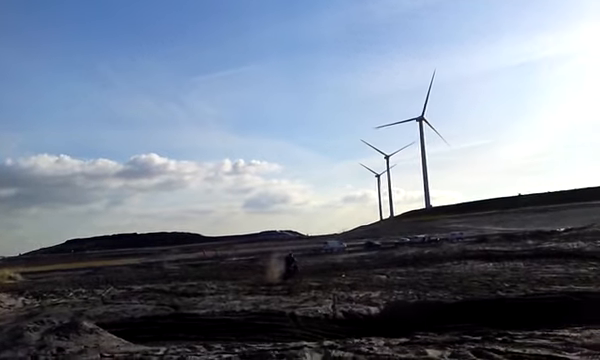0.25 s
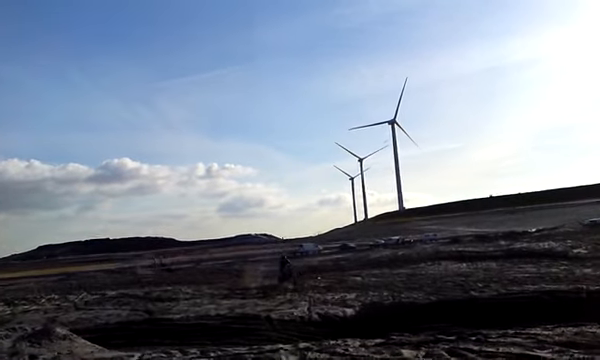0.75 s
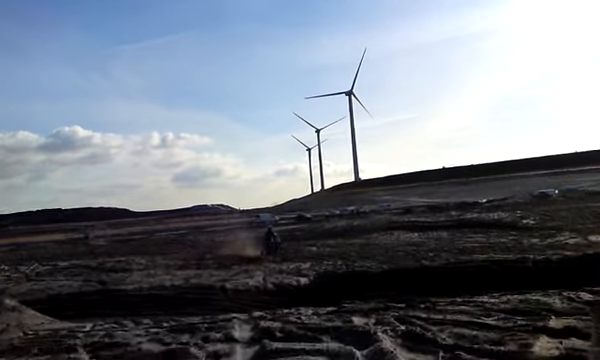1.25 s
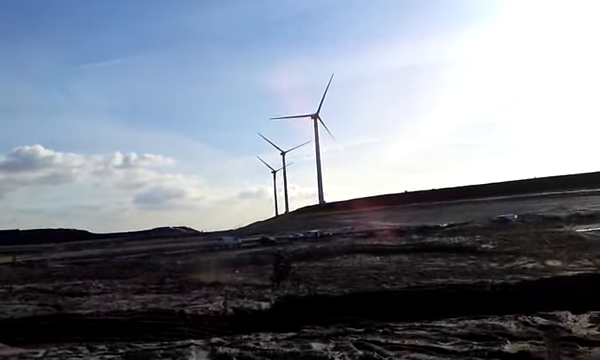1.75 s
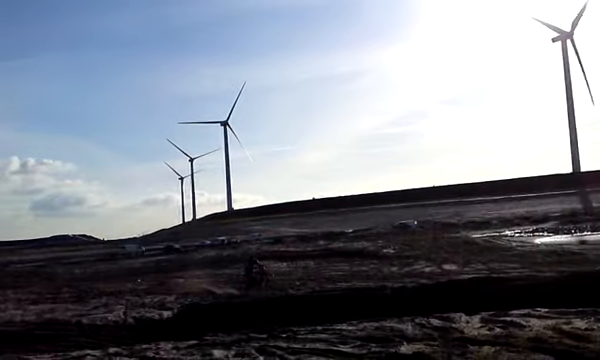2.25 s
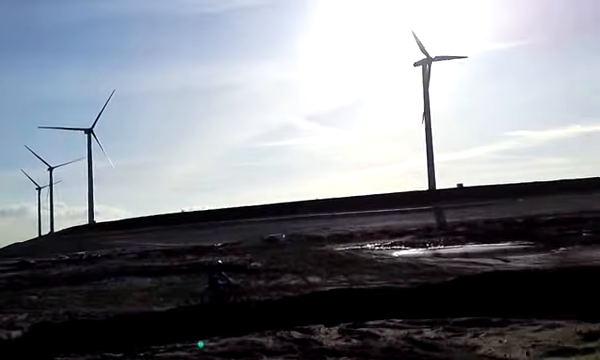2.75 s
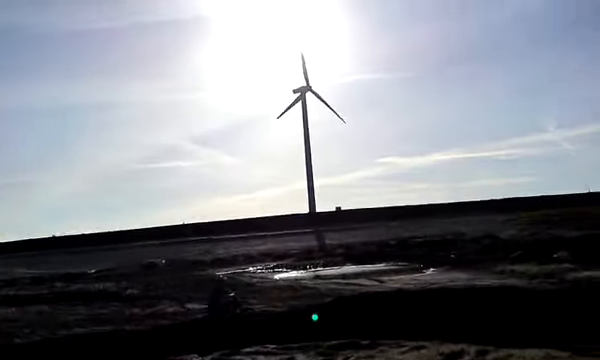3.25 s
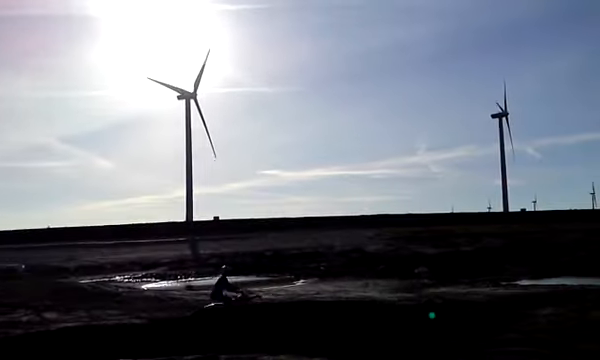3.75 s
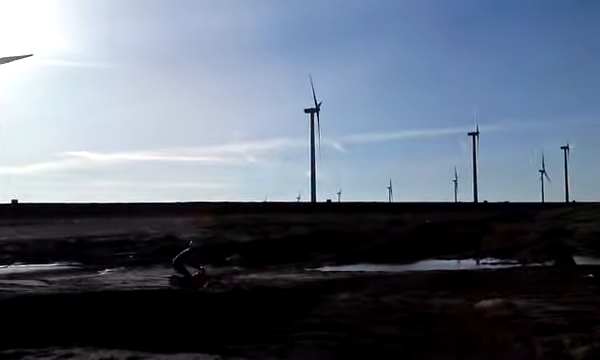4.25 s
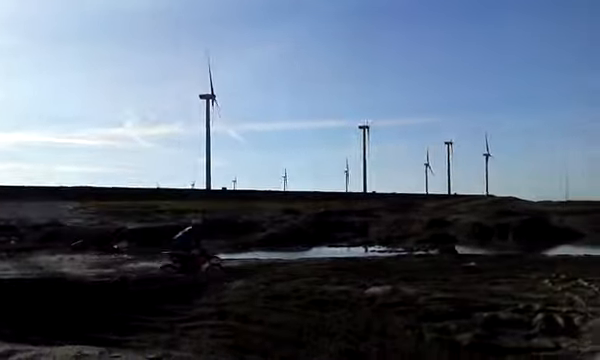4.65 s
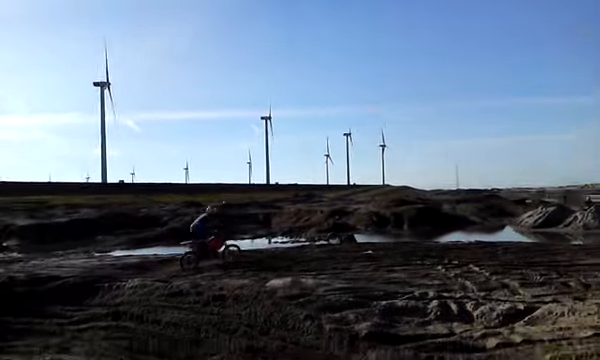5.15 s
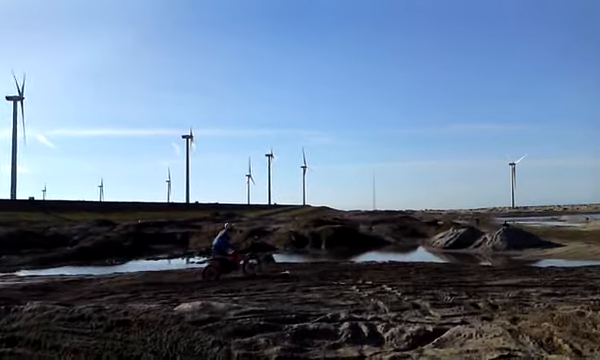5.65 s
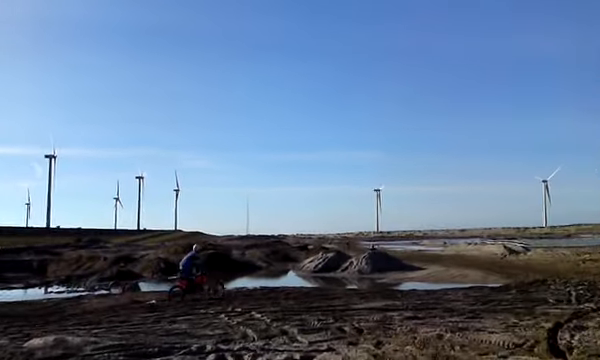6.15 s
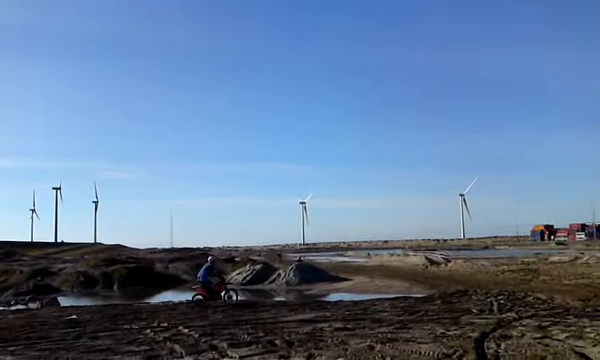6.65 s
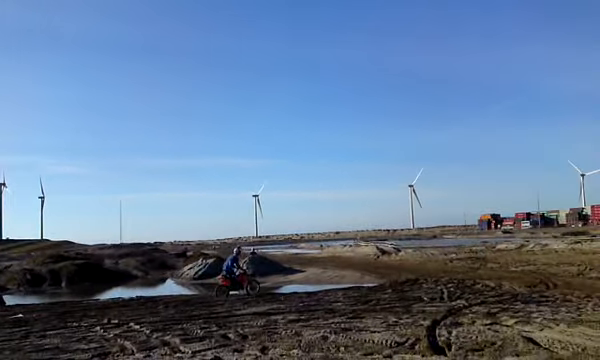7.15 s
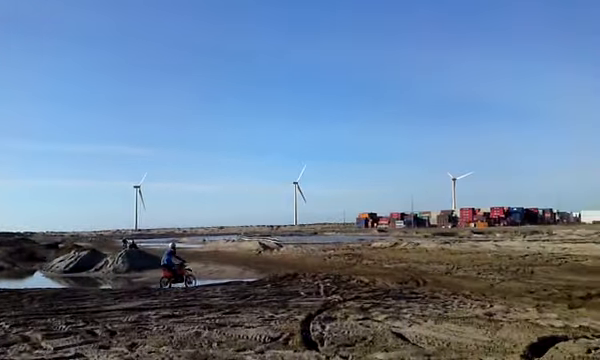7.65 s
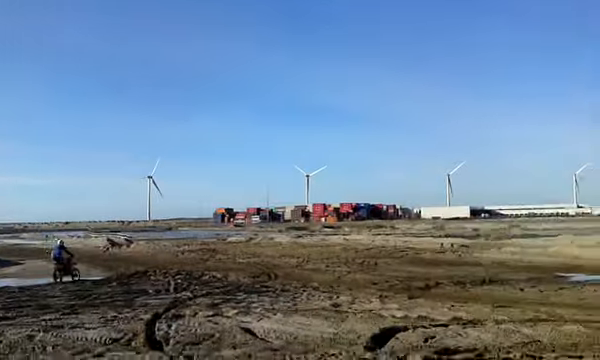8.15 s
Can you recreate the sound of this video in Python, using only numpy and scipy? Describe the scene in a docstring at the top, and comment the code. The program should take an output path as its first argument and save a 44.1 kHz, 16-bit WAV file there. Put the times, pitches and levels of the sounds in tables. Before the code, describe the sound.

Stuttering pops and loud, tinny throttle bursts come from a passing two-stroke dirt bike, with another droning faintly at the end.

```python
"""A two-stroke dirt bike rides past over loose sand. It begins with stuttering pops; from 0.8 s to 2.9 s it
revs in bursts of throttle, the loudest overloading the microphone. Each firing thumps in the exhaust,
barks from the silencer and sets the thin steel expansion chamber ringing. Weaker bursts and more pops
follow, then a last strong burst peaks at 6.5 s. From about 7 s, as the engine coasts, a second bike
drones far off over the open ground."""
import sys
import numpy as np
from scipy import signal
from scipy.fft import rfft, irfft, next_fast_len
from scipy.io import wavfile
from scipy.ndimage import uniform_filter1d

SR = 44100
rng = np.random.default_rng(int(sys.argv[2]) if len(sys.argv) > 2 else 0)


def file_out(sig):
    """Save sig as 16-bit WAV at sys.argv[1]."""
    # one column per channel
    cols = np.atleast_2d(sig).T
    # limit, then scale
    lim = np.clip(cols, -1, 1)
    pcm = np.round(lim * 32767).astype(np.int16)
    wavfile.write(sys.argv[1], SR, pcm)


N = 369558
TIME = np.arange(N) / SR


def from_db(db):
    """Logarithmic level: 20 dB is a factor of ten in amplitude."""
    return 10 ** (np.asarray(db) / 20)


def in_time(rows):
    """Linear interpolation: each column of a time table at every sample."""
    times, *columns = np.transpose(rows)
    return [np.interp(TIME, times, column) for column in columns]


def coloured(x, spectrum):
    """Zero-phase filtering: the spectrum is multiplied by a gain curve (f/Hz, level/dB)."""
    hz, db = np.transpose(spectrum)
    padded = next_fast_len(len(x))
    bins = np.maximum(np.fft.rfftfreq(padded, 1 / SR), 1)
    gain = from_db(np.interp(np.log(bins), np.log(hz), db))
    return irfft(rfft(x, padded) * gain, padded)[:len(x)]


def noise(spectrum, size=N):
    """Spectral shaping: white noise is coloured and scaled to unit rms."""
    x = coloured(rng.standard_normal(size), spectrum)
    return x / np.sqrt(np.mean(x ** 2) + 1e-20)


def drift(rate_hz):
    """Slow random modulation: straight lines between Gaussian values."""
    knots = rng.standard_normal(4000)
    return np.interp(TIME * rate_hz, np.arange(len(knots)), knots)


def click_train(at, energy_db):
    """Impulse excitation: one click per time, its energy in dB re one second at full scale."""
    clicks = np.zeros(N)
    samples = np.clip(np.round(at * SR).astype(int), 0, N - 1)
    np.add.at(clicks, samples, from_db(energy_db) * np.sqrt(SR))
    return clicks


def excite(drive, response):
    """Convolution: a linear system, its impulse response scaled to unit energy, answers the drive."""
    return signal.oaconvolve(drive, response / np.linalg.norm(response))[:N]


def ringing(modes):
    """Modal superposition: a blow leaves damped cosines, the wider in band the shorter lived."""
    t = TIME[:SR // 5]
    return sum((-1) ** k * from_db(db) * np.sqrt(width)
               * np.exp(-np.pi * width * t) * np.cos(2 * np.pi * hz * t)
               for k, (hz, width, db) in enumerate(modes))


def diffuse_bursts(clicks, spectrum, hold_s, tail_s, tail_db, turbulent_share, sides=8):
    """Scattering: each click gives a burst of dense modes and turbulence, with a tail off the ground."""
    t = TIME[:SR // 4]
    envelope = np.exp(-(t / hold_s) ** 4) + from_db(tail_db) * np.exp(-t / tail_s)
    # the passing bike shows one side after another, each with its own mix of modes
    side = np.linspace(0, sides - 1, N)
    modes = np.zeros(N)
    for k in range(sides):
        in_view = np.sqrt(np.maximum(1 - np.abs(side - k), 0))
        modes += excite(clicks * in_view, envelope * noise(spectrum, size=len(t)))
    energy = signal.oaconvolve(clicks ** 2, envelope ** 2 / np.sum(envelope ** 2))[:N]
    turbulence = np.sqrt(turbulent_share * np.abs(energy)) * noise(spectrum)
    return np.sqrt(1 - turbulent_share) * modes + turbulence


def open_air(level_db=-37.5):
    """Stationary noise: the open air is a steady broadband background."""
    # ambient spectrum: f/Hz, relative level/dB
    air_spectrum = [(20, -33.5), (60, -6.5), (130, 0), (500, -10.5), (750, -4), (2500, -7.5), (7000, -3),
                    (9500, -60.5)]
    return from_db(level_db) * noise(air_spectrum)


def far_bike(waver=0.0055, fading_db=4.5, db_per_octave=-3.5, harmonics=6):
    """Atmospheric propagation: only low harmonics carry far, each fading in and out in the moving air."""
    # the distant engine: t/s, firing rate f/Hz, level/dB
    drone = [(6.5, 232, -75), (6.75, 158, -79), (7.07, 188, -52), (7.24, 211, -47), (7.42, 208, -46.5),
             (7.55, 199, -56), (8.05, 185, -53), (8.18, 185, -48.5), (8.38, 190, -47)]
    rate, level = in_time(drone)
    phase = 2 * np.pi * np.cumsum(rate * (1 + waver * drift(30))) / SR
    return sum(from_db(level + db_per_octave * np.log2(k) + fading_db * drift(9)) * np.sin(k * phase)
               for k in range(1, harmonics + 1))


def throttle():
    """Drive, load and inertia: crank speed, ring level and thump level climb, sag and fall back."""
    # crank speed when coasting: t/s, f/Hz
    coast_speed = [(0, 89), (.3, 85), (.5, 75.5), (3.4, 77), (4.6, 72.3), (5.5, 70), (6.06, 65.5),
                   (6.9, 72.3), (7.4, 56.3), (7.75, 61.5), (8, 68.5), (8.38, 58)]
    # running on a nearly shut throttle: t/s, ring level/dB, thump level/dB
    coast_level = [(0, -20.5, -52), (.17, -29.5, -52.5), (.45, -27.5, -38.5), (.75, -27, -43),
                   (2.98, -24, -43), (3.1, -39, -58.5), (3.4, -40.5, -62), (4.5, -33, -57),
                   (4.7, -20.5, -42), (4.79, -42, -66), (5.18, -21.5, -41.5), (5.5, -21, -54),
                   (6.1, -20.5, -59), (6.85, -37, -72), (7.35, -36, -69), (7.55, -24, -64),
                   (7.92, -20.5, -63), (8.38, -23, -58)]
    # bursts of throttle: opening, peak and shutting t/s; firing rate f/Hz at opening and peak;
    # ring level/dB at opening and peak; thump level/dB
    throttle_bursts = [(0.799, 1.1, 1.14, 81, 96, -18.5, -11.5, -40),
                       (1.11, 1.281, 1.72, 107, 163, -8.5, -3, -41),
                       (1.56, 1.82, 1.945, 146, 170, -9, 0, -38),
                       (2.151, 2.47, 2.53, 97, 140, -11, -3.5, -37),
                       (2.625, 2.77, 2.86, 134, 157, -7.5, -8.5, -36.5),
                       (3.438, 3.659, 3.7, 79.3, 90, -28.5, -25, -41),
                       (3.865, 4.125, 4.14, 88, 107, -25.5, -22.5, -34.5),
                       (5.56, 5.73, 5.85, 76, 83, -18.5, -15.5, -33),
                       (6.13, 6.52, 6.545, 72, 105.5, -18.5, -7.5, -36.5)]
    climb_power = 1.5  # revs and level climb ever faster as the engine comes on the pipe
    sag_oct_per_s, sag_db_per_s = .9, 21  # past the peak the sand drags the engine down
    shut_db, shut_s, fade_db_per_s = 9, 0.017, 76.5  # shutting cuts the firings, then they fade
    spin_down_s, flywheel_s = .15, .03  # the crank's speed cannot jump
    thump_rise_db, thump_rise_s = 6.5, 0.11  # the thump fills in after opening
    coast, = in_time(coast_speed)
    ring, thump = in_time(coast_level)
    rate = coast
    for opens, peaks, shuts, rate_from, rate_to, db_from, db_to, thump_db in throttle_bursts:
        climb = np.clip((TIME - opens) / (peaks - opens), 0, 1) ** climb_power
        sagging = np.maximum(np.minimum(TIME, shuts) - peaks, 0)
        shut = np.maximum(TIME - shuts, 0)
        driven = (rate_from + (rate_to - rate_from) * climb) * 2 ** (-sag_oct_per_s * sagging)
        rate = np.where(TIME < opens, rate, coast + (driven - coast) * np.exp(-shut / spin_down_s))
        loss = sag_db_per_s * sagging + shut_db * np.minimum(shut / shut_s, 1) + fade_db_per_s * shut
        loss = np.where(TIME < opens, np.inf, loss)
        unfilled = np.clip(1 - (TIME - opens) / thump_rise_s, 0, 1)
        ring = np.maximum(ring, db_from + (db_to - db_from) * climb - loss)
        thump = np.maximum(thump, thump_db - thump_rise_db * unfilled - loss)
    return uniform_filter1d(rate, int(flywheel_s * SR)), ring, thump


def firings(rate, uneven_db=2.0):
    """Two-stroke cycle: one firing per turn, with its time and its share of a second's energy in dB."""
    # ragged firing under full load: t/s, timing scatter/ms
    raggedness = [(1.12, 0.022), (1.25, 0.3), (1.95, 0.46), (2.13, 0.019), (6.42, .03), (6.5, 0.35),
                  (6.8, 0.056)]
    scatter_ms, = in_time(raggedness)
    turns = np.flatnonzero(np.diff(np.floor(np.cumsum(rate) / SR)))
    late, harder = rng.standard_normal((2000, 2))[:len(turns)].T
    at = TIME[turns] + scatter_ms[turns] * late / 1000
    return at, uneven_db * harder - 10 * np.log10(rate[turns])


def pops(rate, scatter_s=.0005, uneven_db=1.0):
    """Intermittent combustion: times and levels of hard firings, alone or every second or third turn."""
    # single hard firings: t/s, relative level/dB
    # the one at 6.6 s holds up the loud end of the last throttle burst
    lone_pops = [(0.0024, -3.5), (0.0574, -6), (0.1153, -4.5), (0.1785, -6), (0.2301, -8), (0.8827, -5.5),
                 (1.0231, -5.5), (2.15, -3), (3.1635, -17), (3.2274, -18), (3.3004, -20.5), (3.4304, -18.5),
                 (3.8321, -9.5), (3.8713, -15.5), (4.2077, -11.5), (4.2786, -10.5), (4.3188, -11.5),
                 (4.3867, -9), (4.8288, -14.5), (4.8942, -11), (6.2888, -2.5), (6.5994, 0.5), (7.334, -5.5),
                 (7.4137, -7), (7.4704, -12)]
    # runs of stutter: first and last t/s, turns per pop, first and last relative level/dB
    stutters = [(0.279, 0.462, 3, -8, -8), (0.515, .833, 3, -10.5, -6.5), (3.456, 3.494, 3, -19, -17.5),
                (4.567, 4.727, 3, -6.5, -9), (4.961, 5.111, 2, -9, -6.5), (5.157, 5.317, 3, -7, -2.5),
                (5.379, 5.505, 2, -5.5, -6), (5.669, 5.816, 3, -0.5, 0), (5.894, 6.054, 3, -3.5, -8)]
    rows = [np.array(lone_pops)]
    for first, last, turns_per_pop, db_from, db_to in stutters:
        turns = rate[(TIME >= first) & (TIME < last)].sum() / SR
        count = int(round(turns / turns_per_pop)) + 1
        at, db = np.linspace((first, db_from), (last, db_to), count).T
        late, harder = rng.standard_normal((20, 2))[:count].T
        rows.append(np.transpose([at + scatter_s * late, db + uneven_db * harder]))
    return np.vstack(rows).T


def exhaust_thump(clicks):
    """Gas-column resonance: the exhaust thumps through a narrow mouth that radiates little deep bass."""
    # modes of the gas: f/Hz, bandwidth/Hz, relative level/dB
    gas_modes = [(174.5, 35, 1.5), (286, 150, -16), (391, 69, -10.5)]
    # radiation from the mouth: f/Hz, gain/dB
    pipe_mouth = [(80, -5), (115, -4), (165, 0)]
    return coloured(excite(clicks, ringing(gas_modes)), pipe_mouth)


def tailpipe(clicks, decay_s=0.046, turbulent_share=.72):
    """Forced resonance: a sharp front and a dying puff of turbulent gas drive the tailpipe's modes."""
    # modes beamed backwards: f/Hz, bandwidth/Hz, relative level/dB
    tailpipe_modes = [(1785, 310, -4), (2567, 54, -6), (2826, 110, -3.5), (3277, 87, -2.5),
                      (3805, 110, 1.5), (4660, 76, 5.5)]
    fade = np.exp(-2 * TIME[:SR // 5] / decay_s)
    energy = signal.oaconvolve(clicks ** 2, fade / fade.sum())[:N]
    fronts = np.sqrt(1 - turbulent_share) * clicks
    puffs = np.sqrt(turbulent_share * np.abs(energy)) * rng.standard_normal(N)
    return excite(fronts + puffs, ringing(tailpipe_modes))


def silencer(clicks, bark_db=-6.5, jet_db=-0.5):
    """Cavity resonance and jet noise: each pulse barks in the silencer and leaves as a turbulent jet."""
    # modes of the silencer: f/Hz, bandwidth/Hz, relative level/dB
    silencer_modes = [(693, 56, -0.5), (882, 75, 0), (1000, 120, 3), (1360, 110, -13.5), (1880, 13, -0.5)]
    # turbulence in its jet: f/Hz, relative level/dB
    jet_spectrum = [(120, -7), (330, -4), (500, -12.5), (750, 2.5), (1100, -3), (1500, -5), (2200, -25.5),
                    (4000, -12.5)]
    bark = excite(clicks, ringing(silencer_modes))
    jet = diffuse_bursts(clicks, jet_spectrum, hold_s=0.011, tail_s=0.023, tail_db=-12.5,
                         turbulent_share=.38)
    return from_db(bark_db) * bark + from_db(jet_db) * jet


def expansion_chamber(clicks, wall_db=-16.0):
    """Shell vibration: each pulse rings the thin steel, a few modes standing out from a dense mass."""
    # colour of the chamber: f/Hz, relative level/dB
    chamber_spectrum = [(2600, -22.5), (3300, -23), (3600, -7.5), (3850, -6), (4400, 0.5), (5100, 0),
                        (6000, 1), (7100, -1), (7800, -4.5), (8400, -13), (9000, -19), (9500, -78)]
    # its strongest wall modes: f/Hz, bandwidth/Hz, relative level/dB
    wall_modes = [(1890, 29, -9.5), (3837, 15, 2.5), (4270, 68, 0), (4420, 22, -7.5), (5820, 48, 5),
                  (6344, 40, 8)]
    dense_ring = diffuse_bursts(clicks, chamber_spectrum, hold_s=0.024, tail_s=0.033, tail_db=-10.5,
                                turbulent_share=.2)
    return dense_ring + from_db(wall_db) * excite(clicks, ringing(wall_modes))


def turning_treble(rasp):
    """Directivity: the low treble swells and fades as the bike turns."""
    # the band affected: f/Hz, weight/dB
    treble_band = [(3100, -29), (3700, -4.5), (4700, 1), (5600, -29)]
    # its lift or cut at full weight: t/s, level/dB
    treble_level = [(0, 1), (1.4, -2), (2.6, 0.5), (3.6, 2), (6.4, 1), (7.3, 1), (8.38, -7)]
    lift_db, = in_time(treble_level)
    return rasp + (from_db(lift_db) - 1) * coloured(rasp, treble_band)


def near_bike(ring_db=0.5, pop_ring_db=-28.0, pop_bark_db=-27.5, pop_thump_db=-55.5):
    """Source and filter: steady firings and pops drive the same chamber, silencer and pipe."""
    # directivity as the bike turns: t/s, silencer gain/dB, tailpipe gain/dB
    facing = [(0, -29, -43), (.3, -26, -34), (.48, -13.5, -30), (.8, -20, -20.5), (1.3, -23, -21),
              (2.8, -17, -13), (3.35, -11.5, -6), (3.55, -6, -7), (4.1, -7, -10), (4.3, -11.5, -14.5),
              (4.7, -10, -10.5), (5.5, -16.5, -10.5), (6.45, -15, -5), (7.1, -22.5, -7), (7.9, -21.5, -6.5),
              (8.38, -28, -8.5)]
    silencer_gain, tailpipe_gain = from_db(in_time(facing))
    rate, ring_level, thump_level = throttle()
    at, share_db = firings(rate)
    ring = np.interp(at, TIME, ring_level) + share_db
    thump = np.interp(at, TIME, thump_level) + share_db
    pop_at, pop_db = pops(rate)
    on_chamber = click_train(at, ring + ring_db) + click_train(pop_at, pop_db + pop_ring_db)
    on_silencer = click_train(at, ring) + click_train(pop_at, pop_db + pop_bark_db)
    on_pipe = click_train(at, thump) + click_train(pop_at, pop_db + pop_thump_db)
    rasp = expansion_chamber(on_chamber) + tailpipe(tailpipe_gain * on_chamber)
    return turning_treble(rasp) + silencer(silencer_gain * on_silencer) + exhaust_thump(on_pipe)


def scene():
    """Superposition: both bikes and the open air add in one channel."""
    return (near_bike() + far_bike() + open_air())[None]


def record(dry, ceiling=0.62, knee=31.0, lopsided=0.1, resonance_hz=8500, top_db=-7.5,
           low_cut_hz=16, cutoff_hz=15800):
    """Saturation: the microphone passes little above its resonance and clips the peaks unevenly."""
    heard = signal.sosfilt(signal.cheby1(12, .2, resonance_hz, fs=SR, output="sos"), dry)
    limit = ceiling * (1 + lopsided * np.sign(heard))
    clipped = heard / (1 + np.abs(heard / limit) ** knee) ** (1 / knee)
    body = signal.sosfiltfilt(signal.butter(8, resonance_hz, fs=SR, output="sos"), clipped)
    shelved = body + from_db(top_db) * (clipped - body)  # softens the highest distortion products
    centred = signal.sosfilt(signal.butter(1, low_cut_hz, "high", fs=SR, output="sos"), shelved)
    return signal.sosfiltfilt(signal.ellip(10, .05, 70, cutoff_hz, fs=SR, output="sos"), centred)


dry = scene()
out = record(dry)
file_out(out)
```